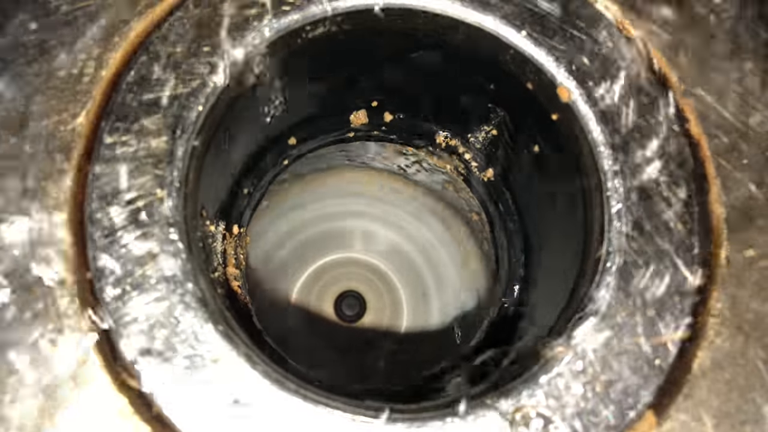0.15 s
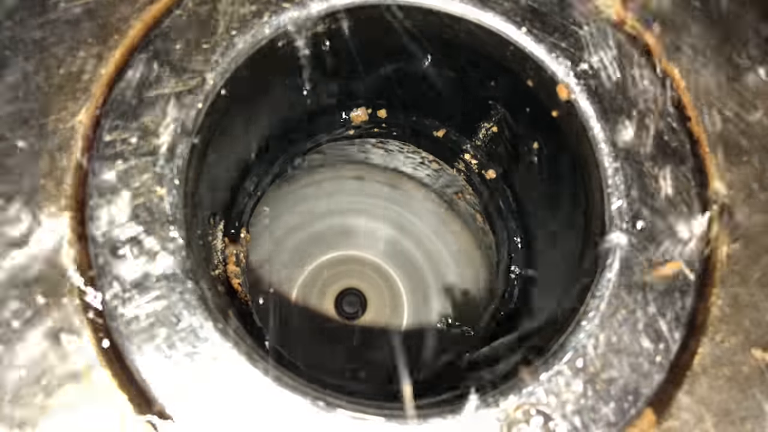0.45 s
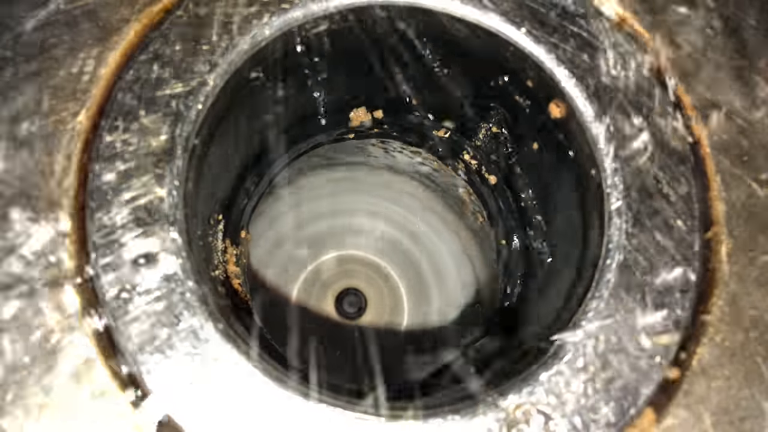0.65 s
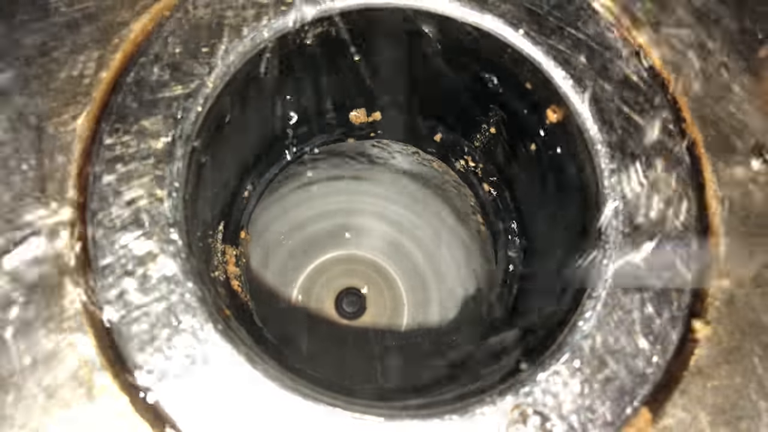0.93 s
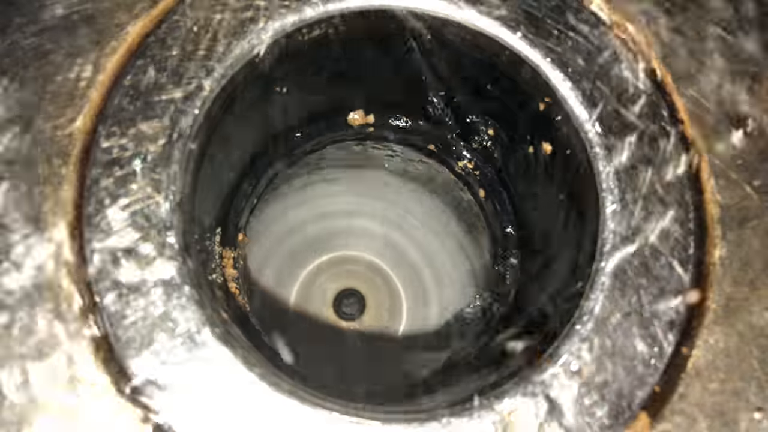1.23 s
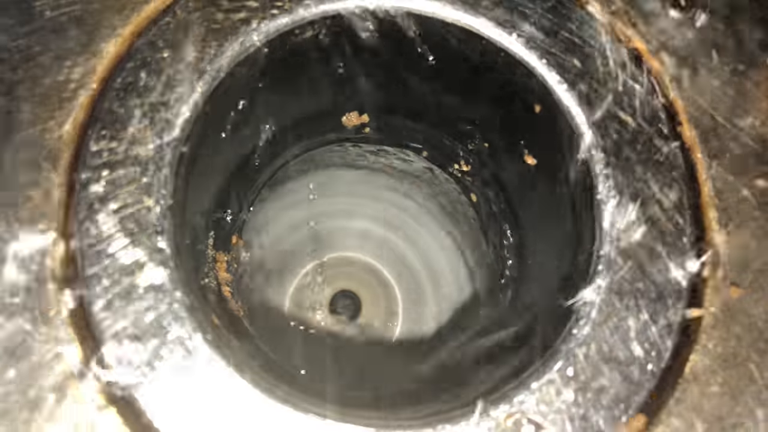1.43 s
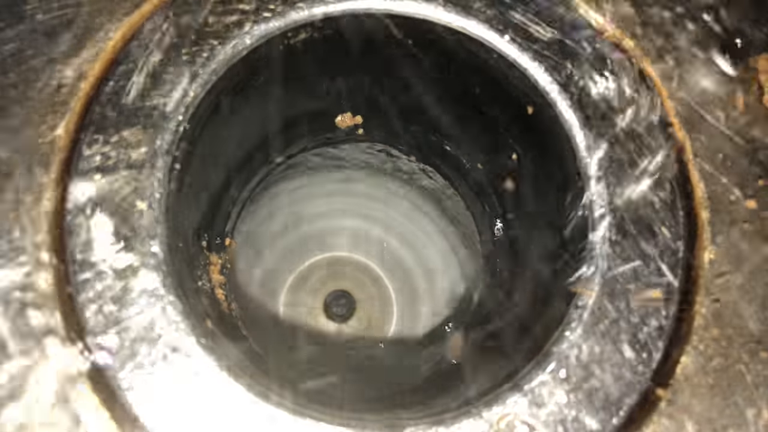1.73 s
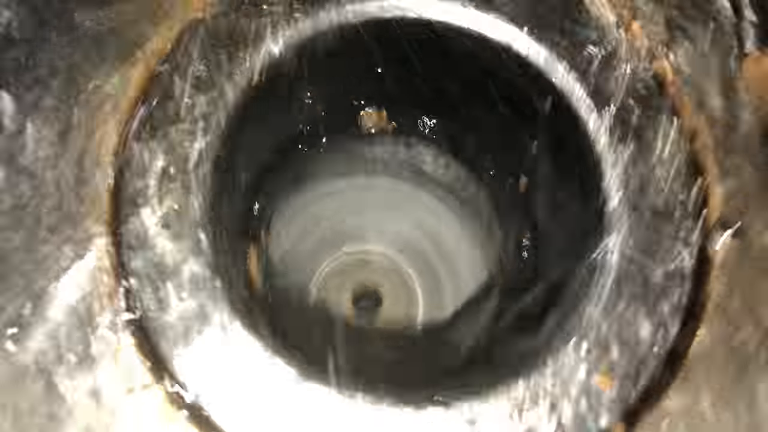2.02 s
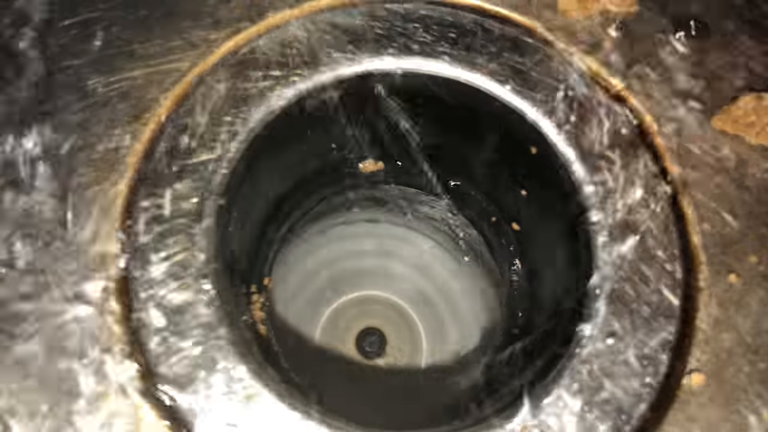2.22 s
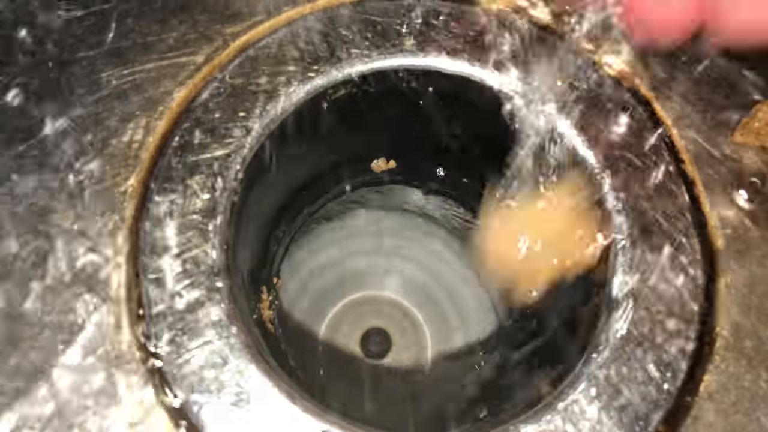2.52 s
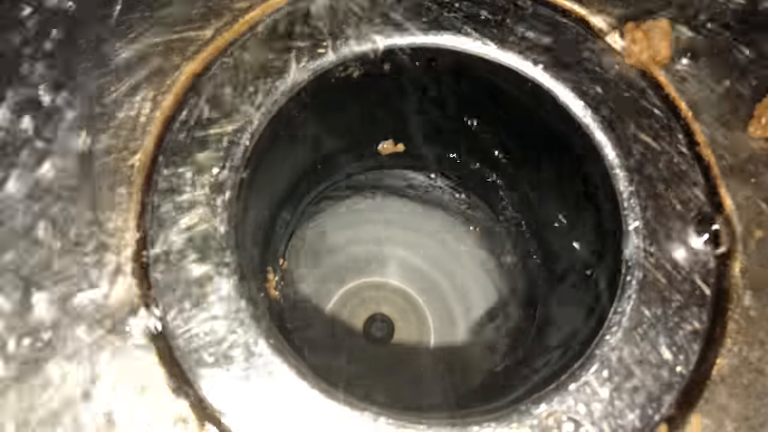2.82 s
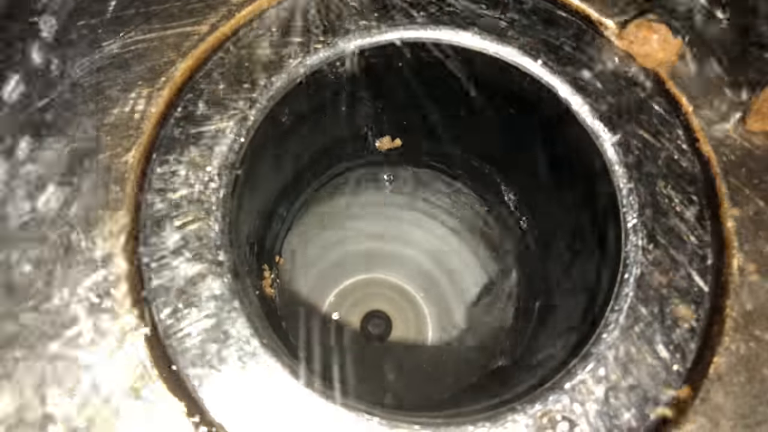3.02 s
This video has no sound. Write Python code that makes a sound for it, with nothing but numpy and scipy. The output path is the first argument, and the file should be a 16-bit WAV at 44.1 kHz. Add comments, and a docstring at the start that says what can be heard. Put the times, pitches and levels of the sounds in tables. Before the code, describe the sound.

A garbage disposal runs throughout, close above a steel sink drain. A steady motor hum and whine near 2.4 kHz sit within a loud, midrange wet grinding roar, fluttering rapidly, with fine bright spatter and bowl rumble. Hard bits crack irregularly from the start; soft thumps come around 1.6 and 2.05 seconds. From 2.65 cracks crowd together, with heavier thumps at 2.85 and 3.0 as the whine sags. It ends still running.

```python
"""Under a steel sink, heard close above the drain, a garbage disposal runs.
Its motor hums and whines as tones locked to the shaft; two lugs on the spinning plate fling water
and crumbs, filtered noise and impacts that pulse with the lugs. Drops spatter as brief rings, chips crack
as noise bursts, the bowl rumbles and rings, and soft pieces thump, the last ones as a big piece jams."""
import sys
import numpy as np
from scipy import signal
from scipy.fft import rfft, irfft
from scipy.io import wavfile
from scipy.ndimage import uniform_filter1d, minimum_filter1d, map_coordinates

SR = 44100
rng = np.random.default_rng(int(sys.argv[2]) if len(sys.argv) > 2 else 0)


def wrap_up_sound(samples):
    """Save the sound to the file named by the first command line argument, as 16-bit audio."""
    columns = np.atleast_2d(samples).T
    # keep every value between -1 and 1, then stretch to whole-number steps
    tamed = np.clip(columns, -1, 1)
    steps = np.round(tamed * 32767).astype(np.int16)
    wavfile.write(sys.argv[1], SR, steps)


N = 139356

# commutator whine, sets the shaft speed: start_s, pitch_hz
WHINE_PITCH = [(0, 2417), (.6, 2402), (.97, 2420), (1.3, 2391), (1.55, 2393), (1.72, 2405), (2, 2375),
               (2.15, 2365), (2.45, 2357), (2.75, 2400), (2.85, 2372), (2.95, 2364), (3.02, 2323),
               (3.16, 2318)]
# churning of the grind chamber: start_s, level_db
CHURN_LEVEL = [(0, -13.5), (.63, -14), (.78, -12), (.86, -16), (.96, -15.5), (1.33, -13), (1.76, -15),
               (2.15, -13.5), (2.23, -17), (2.4, -14), (2.55, -15), (2.76, -13.5), (2.85, -9.5),
               (2.89, -15), (2.92, -9.5), (2.98, -13.5), (3.01, -12), (3.16, -14.5)]
# colour of the grind chamber: freq_hz, gain_db (relative)
CHAMBER_COLOUR = [(500, -27), (730, -67), (803, -38), (911, -17.5), (1060, -12.5), (1110, -1.5),
                  (1190, -4.5), (1230, 2), (1300, 0), (1430, -13), (1550, -0.5), (1650, -1), (1950, -2),
                  (2170, -7.5), (2320, -2.5), (2480, -7), (2730, -15), (3280, -10.5), (3720, -22),
                  (4460, -29), (4920, -22.5), (6500, -47), (9000, -64)]
COMMUTATOR_BARS, LUG_COUNT = 30, 2


def amp(db):
    """Amplitude ratio of a level in dB."""
    return 10 ** (np.asarray(db) / 20)


def unit(x):
    """x scaled to RMS 1."""
    return x / np.sqrt(np.mean(x ** 2) + 1e-20)


def curves(rows):
    """One value per sample for each column after the time."""
    s, *cols = np.transpose(rows)
    return [np.interp(np.arange(N) / SR, s, c) for c in cols]


def wobble(knots_per_s):
    """Smooth random curve through normal-distributed knots."""
    knots = rng.standard_normal(int(N * knots_per_s / SR) + 4)
    return map_coordinates(knots, [np.arange(N) * knots_per_s / SR])


def coloured(x, spectrum):
    """x through the minimum-phase filter with the given (Hz, dB) gain, floored at -70 dB."""
    m = 8192
    hz, db = np.transpose(spectrum)
    log_bins = np.log(np.fft.rfftfreq(m, 1 / SR) + 1)
    gain_db = np.interp(log_bins, np.log(hz), np.maximum(db, -70))
    # fold the cepstrum to make the filter causal
    cepstrum = irfft(np.log(amp(gain_db)))
    cepstrum[1:m // 2] *= 2
    cepstrum[m // 2 + 1:] = 0
    impulse = irfft(np.exp(rfft(cepstrum)))
    return signal.fftconvolve(x, impulse)[:N]


def patchy(depth_db):
    """White noise with time-frequency patches of random gain."""
    z = signal.stft(rng.standard_normal(N), nperseg=512)[2]
    field = uniform_filter1d(rng.standard_normal(z.shape), 5, 0)
    field = uniform_filter1d(field, 6, 1)
    return unit(signal.istft(z * amp(depth_db * unit(field)), nperseg=512)[1][:N])


def grains(per_s, spread_db):
    """Random short impacts of uneven size: decaying bursts of noise."""
    size = amp(spread_db * np.clip(rng.standard_normal(N), -3, 2.2))
    hits = (rng.random(N) < per_s / SR) * size
    envelope = signal.lfilter([1], [1, -.8], hits)
    return unit(envelope * rng.standard_normal(N))


def shaft():
    """Shaft angle in radians: one turn per COMMUTATOR_BARS cycles of whine."""
    return 2 * np.pi * np.cumsum(curves(WHINE_PITCH)[0] / COMMUTATOR_BARS) / SR


def lugs():
    """Gain that peaks as each lug sweeps by."""
    depth, offset_cycles = 0.25, 0.28
    return 1 + depth * np.cos(LUG_COUNT * shaft() + 2 * np.pi * offset_cycles)


def motor():
    """Shaft orders, mains hum and commutator whine; upper orders and whine grow as the whine sags."""
    # multiples of the shaft speed: order, level_db (RMS)
    order_rows = [(1, -34), (2, -41), (3, -35.5), (4, -26), (5, -42), (6, -36.5)]
    # mains hum: freq_hz, level_db (RMS)
    hum_rows = [(120, -26)]
    load_db_per_hz, order_waver_db = 0.01, 1.5
    whine_db, whine_waver_db = -23, 2.45
    t = np.arange(N) / SR
    angle = shaft()
    whine_hz, = curves(WHINE_PITCH)
    load_db = load_db_per_hz * (whine_hz.mean() - whine_hz)
    orders = np.zeros(N)
    for k, db in order_rows:
        # the first order holds steady
        gain_db = db + min(k - 1, 2) * (order_waver_db * wobble(12) + load_db)
        phase_rad = 0.26 * min(k - 1, 3) * wobble(9)
        orders += amp(gain_db) * np.sin(round(k) * angle + phase_rad)
    hum = sum(amp(db) * np.sin(2 * np.pi * hz * t) for hz, db in hum_rows)
    whine_gain = amp(whine_db + whine_waver_db * wobble(29.98) + 2.0 * load_db)
    whine = whine_gain * np.sin(COMMUTATOR_BARS * angle + 0.13 * wobble(40))
    return np.sqrt(2) * (orders + hum + whine)


def thumps():
    """Soft pieces land or jam: each a push of a few cycles under a sine-squared envelope."""
    # pushes: start_s, pitch_hz, level_db (peak), length_cycles
    thump_rows = [(1.175, 57.4, -37, 1.5), (1.557, 128, -13, 1.8), (1.575, 44.4, -22, 0.82),
                  (2.043, 250, -10, 1.7), (2.045, 554.3, -11, 1.07), (2.06, 45, -30, 1.1),
                  (2.85, 403.5, -8.5, 1.55), (2.862, 167.6, -9.5, 3.8), (2.985, 520, -9, 1.4),
                  (3.01, 147, -12, 2.43), (3.015, 323.7, -11, 4.27)]
    out = np.zeros(N + SR)
    for s, hz, db, cycles in thump_rows:
        u = np.arange(int(cycles / hz * SR)) / SR
        envelope = np.sin(np.pi * u * hz / cycles) ** 2
        push = envelope * np.cos(2 * np.pi * hz * u - np.pi * cycles)
        out[round(s * SR):][:len(u)] -= amp(db) * push
    return out[:N]


def bowl_mode(x, hz, width_hz):
    """x ringing one mode of the bowl, a two-pole resonance with gain about 1 at its centre."""
    r = np.exp(-np.pi * width_hz / SR)
    poles = [1, -2 * r * np.cos(2 * np.pi * hz / SR), r * r]
    return (1 - r) * signal.lfilter([1, 0, -1], poles, x)


def sink():
    """The shaken bowl rumbles with the churn, its modes ring and answer each thump; the mount shakes low."""
    # rumble colour: freq_hz, gain_db (relative)
    rumble_colour = [(76, -24.5), (130, -19), (162, -4.5), (215, -9), (312, -14), (366, -6.5), (477, -13),
                     (539, -23.5), (618, -26.5), (760, -53)]
    # bowl modes: freq_hz, width_hz, shaken_level_db (RMS), thumped_gain_db
    mode_rows = [(302.3, 13, -28.5, -12), (603.3, 24, -45, 3), (653, 4.7, -58, -12), (872, 16, -52, 4)]
    mount_colour = [(25, -17), (55, -1), (110, 5.5), (160, -21)]
    rumble_db, mount_db = -28.5, -47
    churn_db, = curves(CHURN_LEVEL)
    rumble = amp(1.5 * (churn_db - churn_db.mean())) * unit(coloured(patchy(2.7), rumble_colour))
    knocks = thumps()
    modes = np.zeros(N)
    for hz, width_hz, shaken_db, thumped_db in mode_rows:
        modes += amp(shaken_db) * unit(bowl_mode(rng.standard_normal(N), hz, width_hz))
        modes += amp(thumped_db) * bowl_mode(knocks, hz, width_hz)
    mount = unit(coloured(rng.standard_normal(N), mount_colour))
    return amp(rumble_db) * rumble + modes + knocks + amp(mount_db) * mount


def drops():
    """Spatters, each a short decaying sine at its own pitch, in clumps and denser as a lug passes."""
    candidates_per_s, level_db = 3 * 350, -41
    centre_hz, decay_cycles = 5540, 13
    n = int(candidates_per_s * N / SR)
    r, g = rng.random((n, 2)), rng.standard_normal((n, 2))
    at = (r[:, 0] * N).astype(int)
    density = lugs() * amp(5.5 * wobble(17))
    keep = r[:, 1] < density[at] / 4
    hz = np.clip(centre_hz * np.exp(0.365 * g[:, :1]), 2500, 15000)
    k = np.arange(200)
    # higher drops are weaker
    size = keep[:, None] * amp(2.6 * g[:, 1:]) * centre_hz / hz
    ring = size * np.exp(-k * hz / SR / decay_cycles) * np.sin(2 * np.pi * hz * k / SR)
    return amp(level_db) * unit(np.bincount((at[:, None] + k).ravel(), ring.ravel())[:N])


def filter_norm(spectrum):
    """Noise gain of a colour filter: the norm of its impulse response."""
    return np.linalg.norm(coloured(np.eye(1, N)[0], spectrum))


def chips():
    """Hard bits crack on the ring and rattle round: a noise burst in a swell, pulsing with the lugs."""
    # cracks: start_s, body_level_db, treble_level_db (both before the offsets below)
    chip_rows = [(0.0488, -11, -30), (0.274, -13.5, -33), (0.315, -9.5, -29.5), (0.446, -15, -41),
                 (0.607, -12, -26), (0.809, -10, -50), (0.9527, -10, -32), (1.0902, -10.5, -51),
                 (1.4668, -10, -33), (1.6439, -18, -30.5), (1.8288, -12, -28), (2.16, -12, -37),
                 (2.261, -16, -35), (2.387, -14, -57), (2.4077, -15.5, -33), (2.4483, -12.5, -30),
                 (2.6516, -10, -26), (2.7234, -22, -29), (2.7798, -8.5, -28.5), (2.8232, -17, -34),
                 (2.9126, -15.5, -27.5), (2.9649, -7, -29), (2.971, -14.5, -39), (2.9921, -12.5, -28),
                 (3.0584, -11, -41), (3.071, -18, -33)]
    body_offset_db, treble_offset_db = -3, 1.5
    crack_t60_s, rattle_s, rattle_db = 0.011, 0.011, -4.5
    treble_colour = [(4000, -13), (7000, 5.5), (10000, -4), (17000, -19)]
    pre = SR // 20
    t = np.arange(-pre, SR // 10) / SR
    crack = (t >= 0) * amp(-60 * np.abs(t) / crack_t60_s)
    # the swell rises faster than it falls
    swell = amp(rattle_db) * np.exp(-(t / np.where(t < 0, .3, 1) / rattle_s) ** 2)
    body, treble = np.zeros((2, N + SR))
    for s, body_db, treble_db in chip_rows:
        at = round(s * SR)
        body[at:][:len(t)] += amp(body_db + body_offset_db) * (crack + swell)
        treble[at:][:len(t)] += amp(treble_db + treble_offset_db) * (crack ** 1.3 + 0.62 * swell)
    beat = lugs() ** 0.84
    body = body[pre:][:N] * beat * rng.standard_normal(N)
    treble = treble[pre:][:N] * beat * rng.standard_normal(N)
    # chamber colour tilted 12 dB per octave up to 4 kHz
    tilted = [(hz, db + 12 * np.log2(min(hz, 4000) / 3000)) for hz, db in CHAMBER_COLOUR]
    body = coloured(body, tilted) / filter_norm(tilted)
    return body + coloured(treble, treble_colour) / filter_norm(treble_colour)


def grinding():
    """Water and crumbs thrown by the lugs; lumps of slurry make both chamber and spray surge."""
    # spray colour: freq_hz, gain_db (relative)
    spray_colour = [(3500, -21), (5500, 0.5), (7800, 2.5), (10000, -1.5), (12000, -8.5), (17000, -15)]
    spray_db, spray_drift_db_per_s = -38.5, -0.54
    crumbs_per_s, crumb_spread_db = 700, 0.5
    body_crumbs_db, spray_crumbs_db = -1.5, 0  # relative to the water noise
    churn_db, = curves(CHURN_LEVEL)
    beat = lugs()
    surge_db = 0.53 * wobble(25) + 1.03 * wobble(60)
    # crumbs come in clumps
    crumbs = unit(grains(crumbs_per_s, crumb_spread_db) * amp(2.7 * wobble(40)))
    body = (patchy(1.2) + amp(body_crumbs_db) * crumbs) * beat * amp(surge_db)
    spray = (patchy(2.9) + amp(spray_crumbs_db) * crumbs) * beat ** 0.87
    spray *= amp(1.6 * surge_db + 0.87 * wobble(13))
    drift_db = spray_drift_db_per_s * np.arange(N) / SR
    swell = amp(0.31 * (churn_db - churn_db.mean()) + drift_db)
    chamber = amp(churn_db) * unit(coloured(body, CHAMBER_COLOUR))
    return chamber + amp(spray_db) * swell * unit(coloured(spray, spray_colour))


def scene():
    """All layers summed to one channel."""
    return (motor() + sink() + drops() + chips() + grinding())[None]


def record(dry):
    """The microphone drops the deepest bass, a fast limiter holds the peaks, the band ends at top_hz."""
    low_hz, top_hz = 45.3, 17108
    x = signal.lfilter(*signal.butter(2, low_hz, "high", fs=SR), dry)
    limit_gain = minimum_filter1d(1 / np.maximum(np.abs(x), 1), size=89)
    x = x * uniform_filter1d(limit_gain, size=45)
    return irfft(rfft(x) * (np.fft.rfftfreq(N, 1 / SR) < top_hz), N)


dry = scene()
out = record(dry)
wrap_up_sound(out)
```